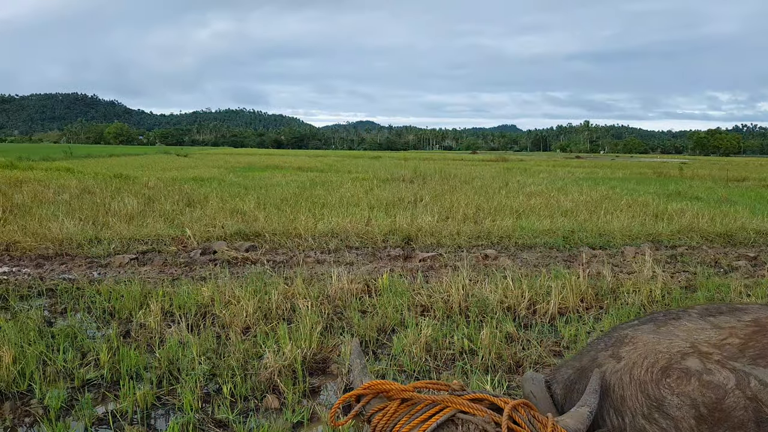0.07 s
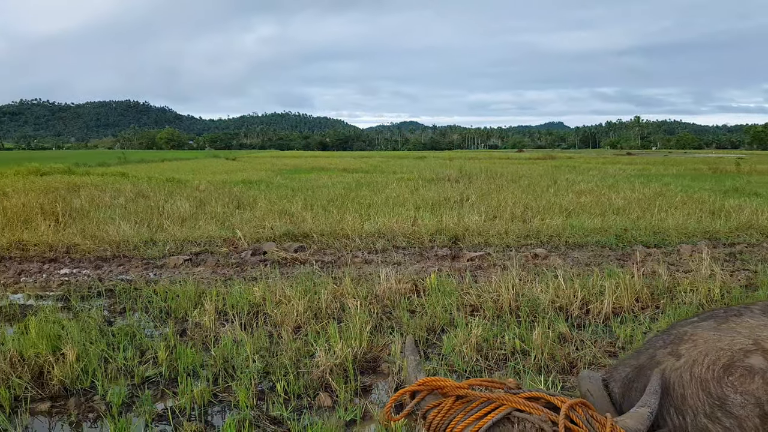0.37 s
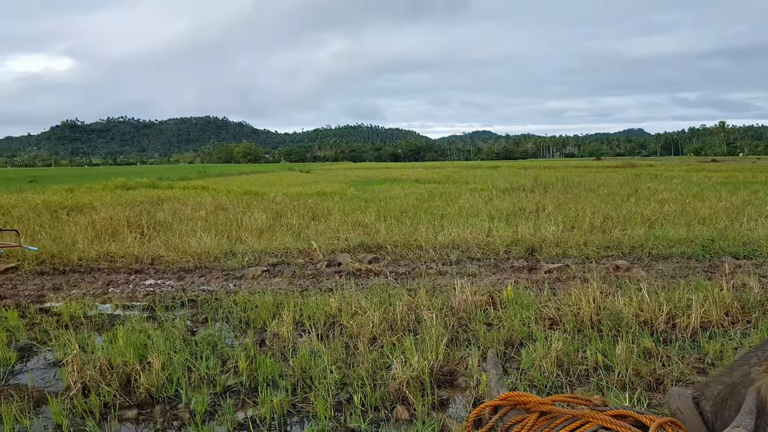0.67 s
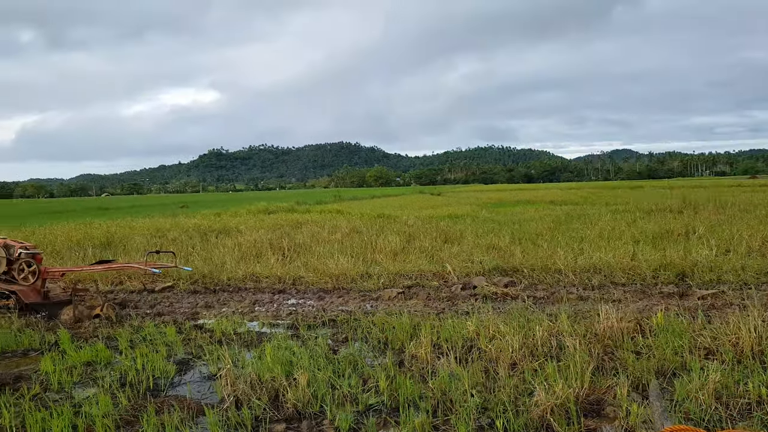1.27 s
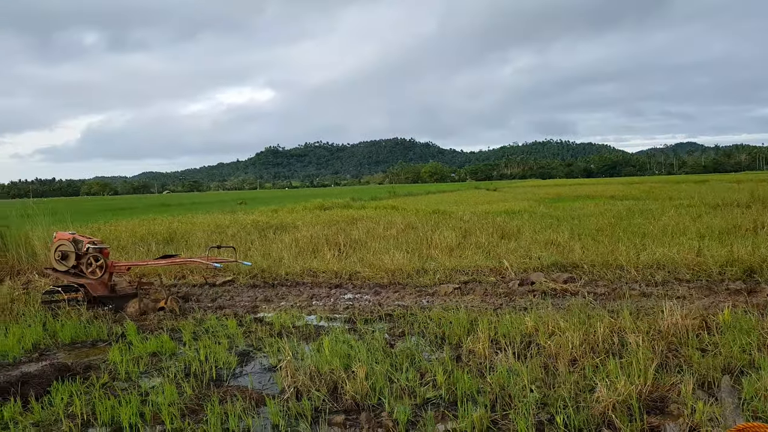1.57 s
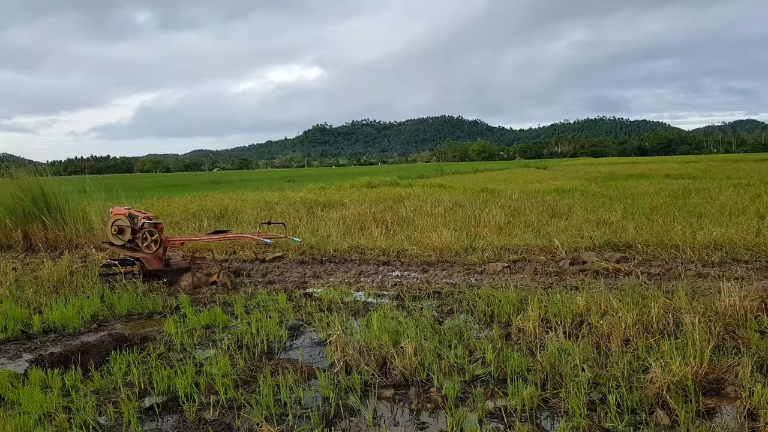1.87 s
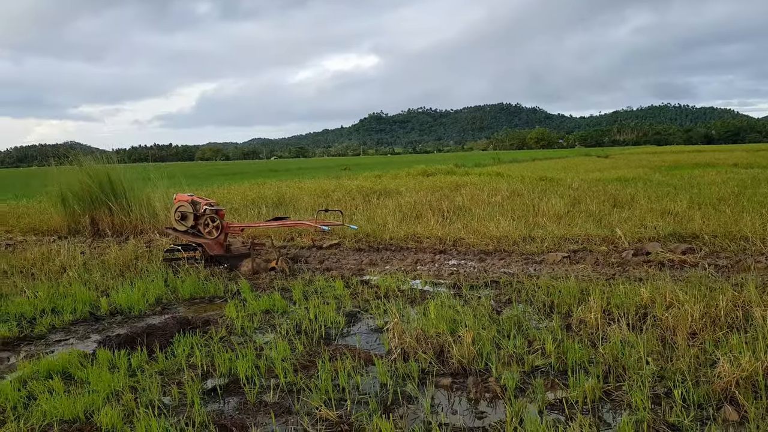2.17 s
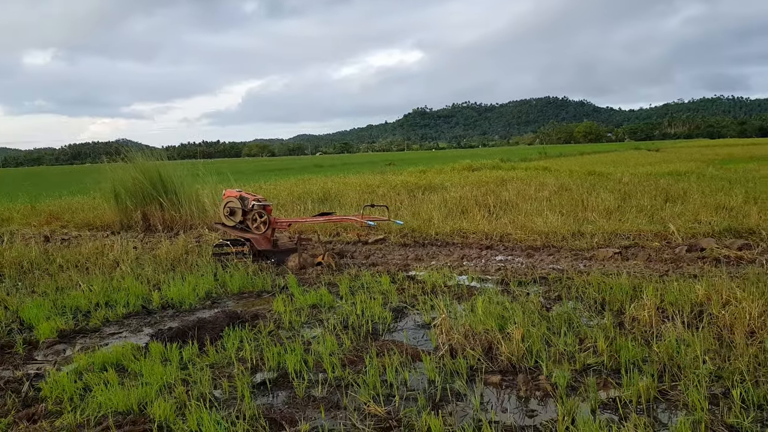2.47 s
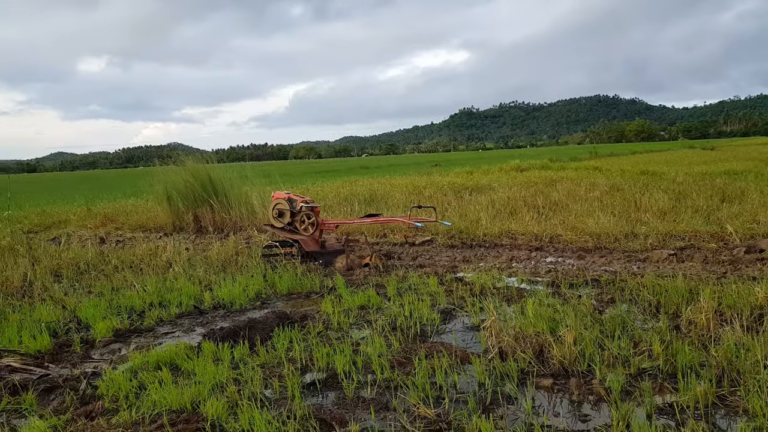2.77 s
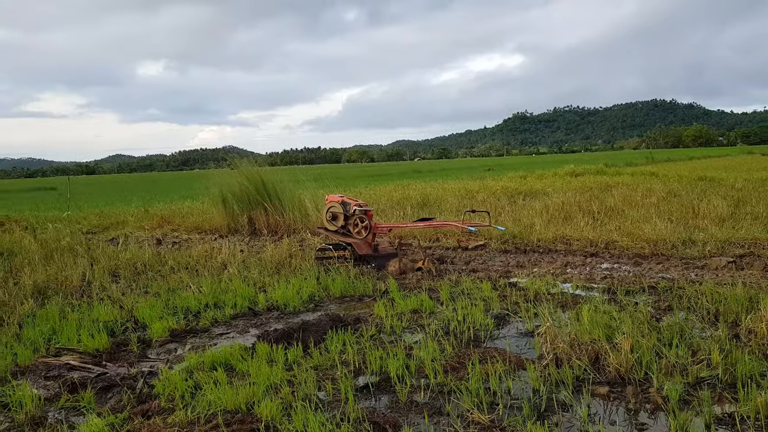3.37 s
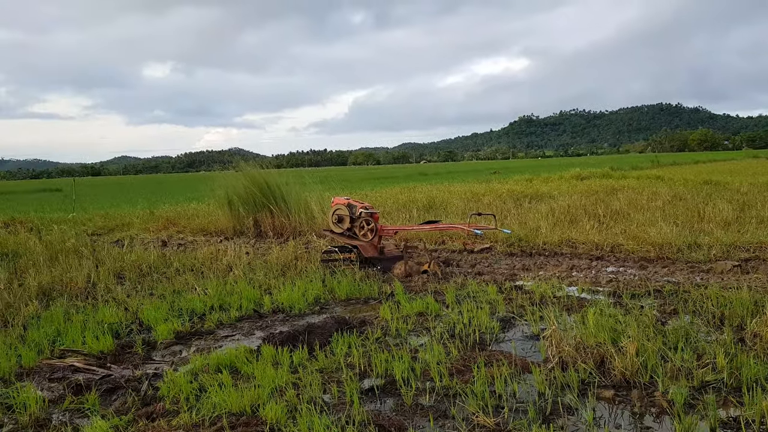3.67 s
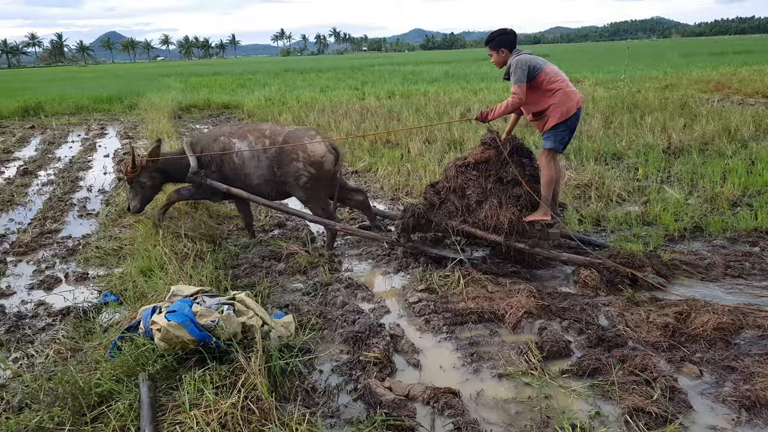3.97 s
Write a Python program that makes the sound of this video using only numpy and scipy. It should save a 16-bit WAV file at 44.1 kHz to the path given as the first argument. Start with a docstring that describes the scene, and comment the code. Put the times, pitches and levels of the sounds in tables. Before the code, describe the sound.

Wind buffets the microphone with a low, fluttering rumble that dips once and returns stronger. Something shifts in the mud a little to the right, with quiet squelches and wet ticks, over the faint insect hiss of an open field.

```python
"""A wet rice field, with gusty wind buffeting both ports of a microphone.
The flow rumbles, fast eddies flutter and thump, and the hardest gusts rasp.
Behind the wind, insects hiss steadily over soft air and a faint far drone. A little to the right,
something shifts in the mud and stubble: soft squelches, wet ticks and snapping stalks over a rustle.
Just before the end, the sound drops out for an instant."""
import sys
import numpy as np
from scipy import signal
from scipy.fft import rfft, irfft, next_fast_len
from scipy.io import wavfile
from scipy.ndimage import uniform_filter1d, map_coordinates

SR = 44100
rng = np.random.default_rng(int(sys.argv[2]) if len(sys.argv) > 2 else 0)


def transcribe(u):
    """Save the signal u as a 16-bit wav file named by the first command-line argument.

    u: samples, shape (n,) or (channels, n), limited to [-1, 1]; the rate is SR.
    q: integer samples, one column per channel.
    """
    v = np.clip(np.atleast_2d(u).T, -1, 1)
    q = np.round(v * 32767).astype(np.int16)
    wavfile.write(sys.argv[1], SR, q)


N = 176400
TIME = np.arange(N) / SR


def amp(db):
    """Decibels to gain."""
    return 10 ** (np.asarray(db) / 20)


def unit(x):
    """Scale to rms 1."""
    return x / np.sqrt(np.mean(x ** 2) + 1e-20)


def curve(rows):
    """Straight lines through (seconds, value) points, at every sample."""
    return np.interp(TIME, *np.transpose(rows))


def wobble(rate):
    """A smooth random curve, rate knots a second."""
    return map_coordinates(rng.standard_normal(8192), [TIME * rate], mode="wrap")


def filtered(x, response):
    """Filter x by a response given as a function of Hz."""
    size = next_fast_len(N + SR // 2)
    return irfft(rfft(x, size) * response(np.fft.rfftfreq(size, 1 / SR)), size)[..., :N]


def colour(points):
    """An EQ curve through (Hz, dB) points on a log axis."""
    point_hz, db = np.transpose(points)
    return lambda hz: amp(np.interp(np.log(hz + 1), np.log(point_hz + 1), db))


def noise(points):
    """Two unrelated channels of noise, coloured by an EQ curve."""
    return unit(filtered(rng.standard_normal((2, N)), colour(points)))


def patchy(x, depth_db, size=512):
    """Make a sound shimmer with small random patches of gain over time and frequency."""
    spectrum = signal.stft(x, nperseg=size)[2]
    patches = uniform_filter1d(rng.standard_normal(spectrum.shape[1:]), size=4, axis=0)
    patches = uniform_filter1d(patches, size=5, axis=1)
    return unit(signal.istft(spectrum * amp(depth_db * unit(patches)), nperseg=size)[1][:, :N])


def banded(bands):
    """Shimmering noise gathered in a few bell-shaped bands."""
    def bells(f):
        return sum(amp(db) * np.exp(-((f - hz) / (2 * spread)) ** 2) for hz, spread, db in bands)
    return patchy(filtered(rng.standard_normal((2, N)), bells), depth_db=2.3)


# The soft tone of the air. Each row: frequency in Hz, gain in dB.
AIR_EQ = [(30, -23), (150, -17), (370, 4), (520, -5), (750, -20.5), (1000, -20.5), (1400, -21.5),
          (1680, -19), (2150, -18), (3800, -35.5), (5500, -22), (9000, -26), (15500, -52)]

def air(level_db=-61):
    """Distant air lays a soft bed under the open field."""
    return amp(level_db) * patchy(noise(AIR_EQ), depth_db=3.0)


# The drone's fade. Each row: time in seconds, level in dB.
DRONE_LEVEL = [(0, -70), (.6, -70), (1.1, -105), (4, -76)]
# Its narrow tones. Each row: centre in Hz, spread in Hz, gain in dB.
DRONE_TONES = [(1357, 86, 2), (1950, 88, -3), (3980, 130, -2.5)]

def drone():
    """A faint far drone fades away early and creeps back near the end."""
    return amp(curve(DRONE_LEVEL)) * banded(DRONE_TONES)


# The swell of the chorus and of a shriller insect. Each row: time in seconds, relative level in dB.
CHORUS_LEVEL = [(0, -63), (.35, -63.5), (.45, -66), (.72, -67.5), (.82, -65), (1, -64.5), (1.08, -67.5),
                (1.7, -67), (2.7, -66), (2.85, -65), (3.65, -64), (3.8, -65), (4, -72)]
SHRILL_LEVEL = [(0, -72.5), (1.2, -76), (1.7, -69.5), (2.6, -72.5), (3.1, -71), (3.5, -68.5), (4, -75.5)]
# Where each one sings. Each row: centre in Hz, spread in Hz, gain in dB.
CHORUS_VOICE = [(6800, 350, -2), (8800, 420, 5), (9700, 1900, -8.5), (13600, 1000, -21)]
SHRILL_VOICE = [(10210, 230, -1), (11200, 280, -9)]

def insects(trim_db=2.5):
    """Many far insects merge into a few shrill, slightly wavering bands."""
    singers = (CHORUS_LEVEL, CHORUS_VOICE), (SHRILL_LEVEL, SHRILL_VOICE)
    return sum(amp(curve(level) + trim_db + 0.5 * wobble(40)) * banded(voice)
               for level, voice in singers)


# The swell of the crackle and of the sizzle. Each row: time in seconds, relative level in dB.
CRACKLE_LEVEL = [(0, -66), (.18, -62), (.29, -56), (.46, -53), (.81, -57.5), (.95, -55.5), (1.05, -64),
                 (1.2, -70), (1.4, -64), (1.54, -54.5), (1.79, -61), (1.9, -56.5), (2.06, -53.5),
                 (2.16, -64.5), (2.42, -67), (2.53, -54), (2.66, -51.5), (2.85, -61.5), (3.1, -64.5),
                 (3.23, -58), (3.36, -56.5), (3.58, -64), (4, -64)]
SIZZLE_LEVEL = [(0, -88), (.3, -81), (.35, -64), (.6, -67), (1.15, -72.5), (1.38, -61), (1.8, -67),
                (2.0, -62.5), (2.35, -64), (2.58, -61.5), (2.85, -75), (3.08, -75), (3.2, -60), (3.45, -83),
                (4, -77)]
# The tone of each. Each row: frequency in Hz, gain in dB.
CRACKLE_EQ = [(300, 19.5), (900, -13), (1400, 3.5), (1680, -6), (2050, 0), (2600, -1.5), (3500, 1),
              (5500, 0), (8000, -4), (12500, -12.5), (15500, -11)]
SIZZLE_EQ = [(2000, -19), (5000, -4), (8000, -9.5), (11000, -5.5), (12500, 0), (14200, -10.5), (15600, -7)]

def rustle(crackle_trim_db=0.5):
    """Wet stubble crackles faintly under a fine high sizzle."""
    crackle = unit(patchy(noise(CRACKLE_EQ), depth_db=4.0) * amp(wobble(460)))
    sizzle = unit(patchy(noise(SIZZLE_EQ), depth_db=3.5) * amp(2.9 * wobble(400)))
    return amp(curve(CRACKLE_LEVEL) + crackle_trim_db) * crackle + amp(curve(SIZZLE_LEVEL)) * sizzle


# Dry snaps. Each row: start in seconds, level in dB, decay in seconds.
STALK_SNAPS = [(.628, -46, 0.0026), (1.267, -50, 0.0016), (1.608, -41.5, 0.0042), (1.632, -48, .004),
               (1.987, -48, .0016), (3.19, -46, 0.0042)]
# Their bright tone. Each row: frequency in Hz, gain in dB.
STALK_EQ = [(1500, -43), (4000, -11), (6000, 2), (9000, -8), (12000, 2.5), (14000, -5), (15600, -22)]

def snaps():
    """Stalks snap with a short bright crack."""
    envelope = np.zeros(N)
    for start, db, decay in STALK_SNAPS:
        t = TIME - start
        envelope += amp(db) * (t > 0) * np.exp(-np.abs(t) / decay)
    return envelope * noise(STALK_EQ)


# Wet ticks. Each row: start in seconds, relative level in dB, pitch in Hz, decay in seconds.
WET_TICKS = [(1.027, -46.5, 6600, 0.006), (1.488, -36.5, 6700, 0.0026), (1.608, -43, 5450, 0.0016),
             (1.705, -39.5, 6560, 0.0025), (1.83, -28.5, 6126, 0.0029), (1.987, -26, 6030, 0.00058),
             (1.995, -30, 2590, 0.0049), (2.282, -38, 6380, 0.003), (2.548, -37, 5030, 0.0051),
             (.619, -38.5, 2300, 0.0035), (.628, -33, 2500, 0.0012)]

def ticks(rise_s=0.00015, sink_per_s=7.7, roughness=0.17, trim_db=-4):
    """Tiny wet snaps, each a short rough ring that sinks in pitch."""
    out = np.zeros((2, N))
    for start, db, hz, decay in WET_TICKS:
        t = np.clip(TIME - start, 0, 20 * decay)
        jitter = np.array([wobble(roughness * hz), wobble(roughness * hz)])
        phase = 2 * np.pi * hz * t * (1 - sink_per_s * t / 2) + jitter
        envelope = (1 - np.exp(-t / rise_s)) * np.exp(-t / decay)
        out += amp(db + trim_db) * envelope * np.sin(phase)
    return out


# Squelches. Each row: peak time in seconds, level in dB, rise in seconds, fall in seconds,
# spray against mud in dB.
MUD_SQUELCHES = [(0.202, -58, 0.0087, 0.023, -0.5), (0.319, -56.5, 0.0053, 0.047, -9),
                 (0.371, -55.5, 0.0074, 0.024, -13), (.54, -53.5, 0.0035, 0.016, -18),
                 (0.629, -45.5, 0.001, 0.005, -15), (1.566, -58.5, 0.0068, 0.0094, 5),
                 (1.62, -56.5, 0.0097, 0.02, 9), (1.831, -50, 0.0029, 0.0065, -12),
                 (1.869, -54, 0.0086, 0.032, -16), (1.989, -53.5, 0.022, 0.02, -27),
                 (2.037, -56.5, 0.015, 0.031, -12), (2.55, -63.5, 0.001, 0.024, 16),
                 (2.566, -43, 0.0038, 0.033, -11.5), (3.194, -57.5, 0.008, 0.044, -0.5),
                 (3.269, -45, 0.0027, 0.011, -2.5)]
# The tone of the mud and of the spray. Each row: frequency in Hz, gain in dB.
MUD_EQ = [(300, -29), (900, -8.5), (1400, -0.5), (1680, -5), (1960, 4), (2200, 3.5), (2550, 4),
          (3000, -3.5), (4200, -10.5), (6000, -11.5), (9000, -23.5), (16000, -57)]
SPRAY_EQ = [(1500, -16), (3500, -5.5), (5200, -1.5), (6500, -4.5), (7800, -22), (12000, -13), (15500, -38)]

def squelches():
    """Mud sucks and lets go in grainy bursts, with a brighter spray of water."""
    mud_envelope, spray_envelope = np.zeros((2, N))
    for peak, db, rise, fall, spray_db in MUD_SQUELCHES:
        t = TIME - peak
        burst = amp(db) * np.exp(-np.maximum(-t / rise, t / fall))
        mud_envelope += burst
        spray_envelope += amp(spray_db) * burst
    mud = unit(patchy(noise(MUD_EQ), depth_db=4.0) * amp(2.7 * wobble(350)))
    spray = unit(noise(SPRAY_EQ) * amp(3.2 * wobble(600)))
    return mud_envelope * mud + spray_envelope * spray


def from_right(x, lead_s=0.000366, spread=0.71, right_db=1.5):
    """A sound on the right reaches that port sooner and louder; the field's scatter widens it."""
    direct, scattered = x
    pair = np.array([direct + spread * scattered, direct - spread * scattered]) / np.hypot(1, spread)
    shifted = filtered(pair, lambda hz: np.exp(np.outer([-1, 1], 1j * np.pi * hz * lead_s)))
    return shifted * amp([[0], [right_db]])


def turbulence(points, lump_db=8.5, lumps_per_s=90, window=1500):
    """Lumpy pressure noise whose mean strength stays steady."""
    lumpy = noise(points) * amp(lump_db * np.array([wobble(lumps_per_s), wobble(lumps_per_s)]))
    power = uniform_filter1d(uniform_filter1d(lumpy ** 2, window), window // 2)
    levelled = lumpy / np.sqrt(np.abs(power) + 1e-9)
    return unit(filtered(levelled, colour([(8, -30), (25, 1), (900, 0.5), (2000, -10)])))


# Brief holes in the wind. Each row: centre in seconds, depth in dB.
FLOW_LULLS = [(.191, 7.5), (0.547, 12), (1.658, 7), (1.804, 7), (2.077, 7.5), (2.881, 9), (3.187, 8),
              (3.301, 6.5)]

def lull_db(width_s=0.016):
    """How far the wind ducks as the flow slackens for a moment."""
    return sum(db * np.exp(-((TIME - centre) / width_s) ** 2) for centre, db in FLOW_LULLS)


# The rasp's swell. Each row: time in seconds, level before lulls in dB.
RASP_LEVEL = [(2.3, -88), (2.55, -53.5), (2.85, -60), (2.97, -50.5), (3.12, -45), (3.33, -60), (3.68, -74),
              (3.82, -53), (3.93, -71)]
# Its tearing tone, shared with the thumps. Each row: frequency in Hz, gain in dB.
RASP_EQ = [(250, -17), (560, 2.5), (780, -5), (1100, -22.5), (2000, -58)]

def rasp():
    """A midrange rasp runs through the hardest gusts."""
    return amp(curve(RASP_LEVEL) - lull_db()) * turbulence(RASP_EQ)


# Single eddies hitting the ports. Each row: peak time in seconds, relative level in dB,
# half-length in seconds, pitch in Hz, left over right in dB.
EDDY_THUMPS = [(0.108, -27, 0.0067, 216, -5), (.221, -24.5, 0.0079, 204.6, -2.5),
               (0.265, -25.5, 0.0028, 223, 0), (.293, -23, 0.0046, 279, -1), (.305, -25, .007, 89, -1),
               (0.376, -23, 0.0072, 76.4, 4), (0.564, -28.5, 0.0037, 193, -3), (.812, -24, 0.0087, 138, -2),
               (1.564, -28, 0.0035, 294, -4), (1.759, -29.5, 0.0068, 147, -7),
               (1.848, -25.5, 0.0076, 84, -2), (1.864, -20.5, 0.0035, 257.6, -5.5),
               (1.938, -18, 0.0035, 186, -7.5), (1.951, -25.5, 0.00645, 264, 1),
               (1.964, -35, 0.006, 117, 9), (2.108, -18, 0.0022, 166, -5),
               (2.183, -22.5, 0.0034, 259, -6.5), (2.315, -21.5, 0.00364, 398, -0.5),
               (2.461, -25.5, 0.0039, 197, -1), (2.578, -18, .005, 294, 4), (2.637, -17.5, 0.0034, 217, 0),
               (2.665, -19.5, 0.0013, 181, 11), (2.776, -20.5, 0.0051, 254, -5.5),
               (2.845, -29, 0.0062, 116, 10), (2.972, -22.5, 0.0079, 262, -10),
               (3.006, -20, 0.0034, 290, -14), (3.09, -18, 0.0033, 220, 1), (3.112, -22, .004, 450, -0.5),
               (3.242, -24.5, .008, 295, -6), (3.519, -27.5, 0.014, 61.6, 0), (3.558, -21, 0.006, 80, -1),
               (3.605, -25.5, 0.0035, 137, -2), (3.775, -21.5, 0.0033, 279, 2),
               (3.806, -21.5, 0.0023, 314, 1), (3.83, -25, 0.0061, 364, -0.5)]

def thumps(roughness=0.9, steepness=1.87, rasp_db=-17, rasp_reference_hz=388):
    """A strong eddy pushes each port for a swing or two, the nearer one harder; fast eddies rasp."""
    push, tear = np.zeros((2, 2, N))
    for peak, db, half_length, hz, left_db in EDDY_THUMPS:
        span = np.abs(TIME - peak) < 5 * half_length
        t = TIME[span] - peak
        cycles = (t - t[0]) * hz
        drift = [map_coordinates(knots, [cycles], mode="wrap") for knots in rng.standard_normal((2, 64))]
        phase = 2 * np.pi * hz * t + roughness * np.array(drift) + rng.uniform(0, 2 * np.pi)
        pan = unit(amp([[left_db], [0]]))
        swell = pan * amp(db) * np.exp(-np.abs(t / half_length) ** steepness)
        push[:, span] += swell * np.sin(phase)
        tear[:, span] += amp(rasp_db) * swell * hz / rasp_reference_hz
    thud = filtered(push, colour([(20, -14), (45, 2), (1000, -3.5), (2000, -30)]))
    return thud + tear * noise(RASP_EQ)


# The flutter's ride on the gusts. Each row: time in seconds, offset in dB.
FLUTTER_OFFSET = [(0, -5.5), (.15, -12), (.3, -21), (.4, -14.5), (.6, -7), (.82, -12), (1.2, -29),
                  (1.45, -16), (1.55, -4), (1.65, -21), (1.87, -9), (2.1, -10.5), (2.3, -4.5), (2.6, -6),
                  (2.85, -7.5), (3.13, -7.5), (3.26, -2.5), (3.42, -14), (3.6, -9.5), (3.72, -9.5),
                  (3.83, -1), (4, -13.5)]
# Its low-mid tone. Each row: frequency in Hz, gain in dB.
FLUTTER_EQ = [(60, -51), (170, -14), (280, 3.5), (420, 3), (520, -5), (650, -14), (800, -22.5),
              (1100, -33.5), (1700, -40), (4000, -71)]

def flutter(port_db, expansion=1.887):
    """Fast eddies flutter above the rumble, growing more steeply than it as the flow quickens."""
    expanded_db = port_db.mean() + expansion * (port_db - port_db.mean())
    return amp(expanded_db + curve(FLUTTER_OFFSET)) * turbulence(FLUTTER_EQ)


# The gusts at each port. Each row: time in seconds, level before lulls in dB.
LEFT_GUSTS = [(0, -41), (.19, -37), (.36, -34.5), (.43, -45), (.57, -38.5), (.73, -67), (.81, -36.5),
              (.88, -41), (.96, -42.5), (1.03, -70), (1.44, -69), (1.55, -36), (1.65, -38), (1.97, -35.5),
              (2.06, -43.5), (2.11, -31.5), (2.26, -40), (2.63, -34.5), (2.9, -36), (3.12, -34.5),
              (3.3, -40.5), (3.38, -38.5), (3.55, -37), (4, -38.5)]
RIGHT_GUSTS = [(0, -41), (.18, -34.5), (.28, -30.5), (.42, -40), (.6, -42), (.76, -42.5), (.82, -38),
               (.88, -49.5), (.98, -46.5), (1.28, -54.5), (1.5, -41.5), (1.65, -38.5), (1.96, -37),
               (2.04, -40.5), (2.13, -36), (2.38, -39), (2.62, -32), (2.88, -36), (3.12, -33), (3.18, -39),
               (3.44, -39.5), (3.52, -34), (3.7, -36.5), (3.82, -37.5), (4, -41.5)]

def gust_db():
    """Gusts strike the two ports unevenly, while the lulls duck both together."""
    return np.array([curve(LEFT_GUSTS), curve(RIGHT_GUSTS)]) - lull_db()


# The wind's deep body. Each row: frequency in Hz, gain in dB.
RUMBLE_EQ = [(12, -31), (25, -32), (40, -5), (62, 0.5), (110, -2), (200, -7.5), (300, -11.5), (450, -15.5),
             (800, -74), (2000, -110)]

def rumble(port_db):
    """Turbulent pressure gives each port its own low rumble."""
    return amp(port_db) * turbulence(RUMBLE_EQ, lump_db=7, lumps_per_s=70)


def scene():
    """Wind on the ports over the quiet field."""
    ground = from_right(squelches() + ticks() + snaps() + rustle())
    port_db = gust_db()
    wind = rumble(port_db) + rasp() + flutter(port_db) + thumps()
    return wind + ground + insects() + air() + drone()


DROPOUT_START_S, DROPOUT_END_S, TOP_HZ = 3.933, 3.957, 15600

def record(dry):
    """The sound drops out for an instant, and the very top of the treble is cut off."""
    audible = (TIME < DROPOUT_START_S) | (TIME > DROPOUT_END_S)
    gate = uniform_filter1d(1.0 * audible, size=128)
    return filtered(dry * gate, lambda hz: hz < TOP_HZ)


dry = scene()
out = record(dry)
transcribe(out)
```